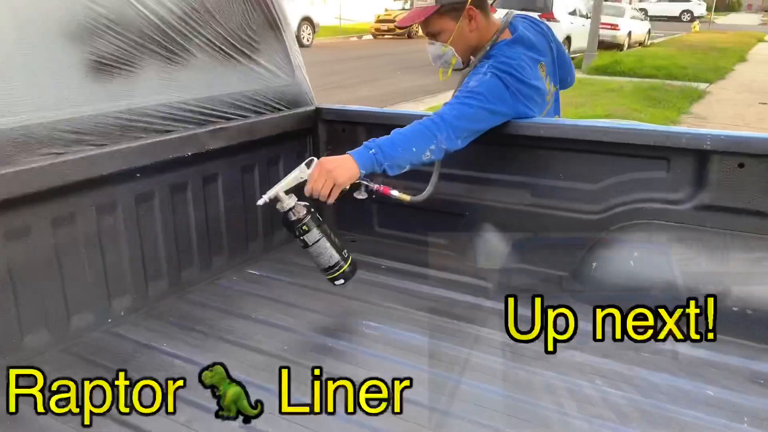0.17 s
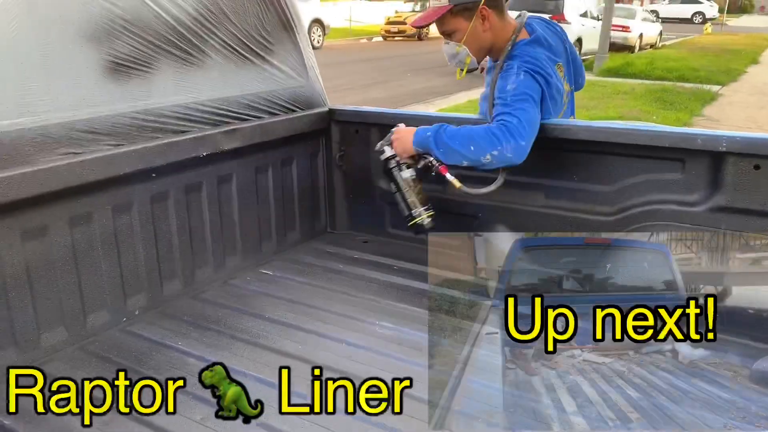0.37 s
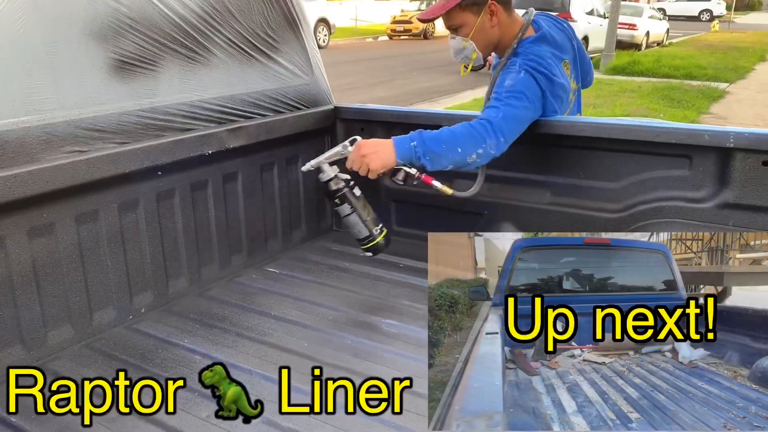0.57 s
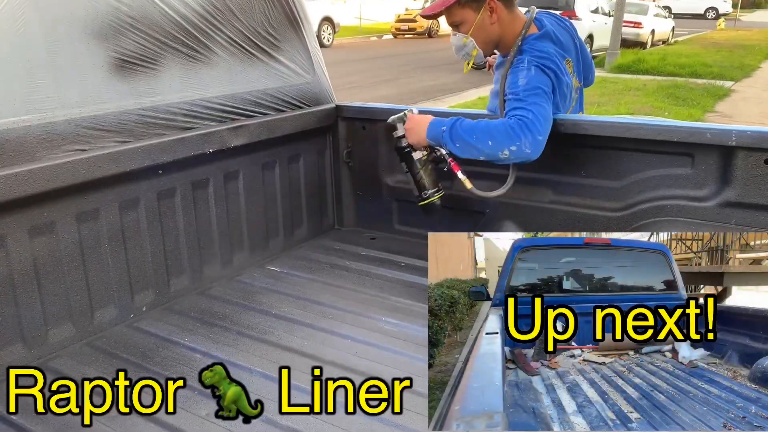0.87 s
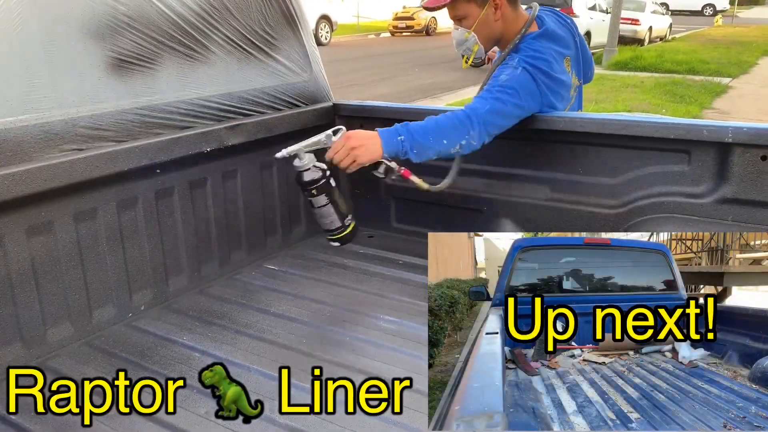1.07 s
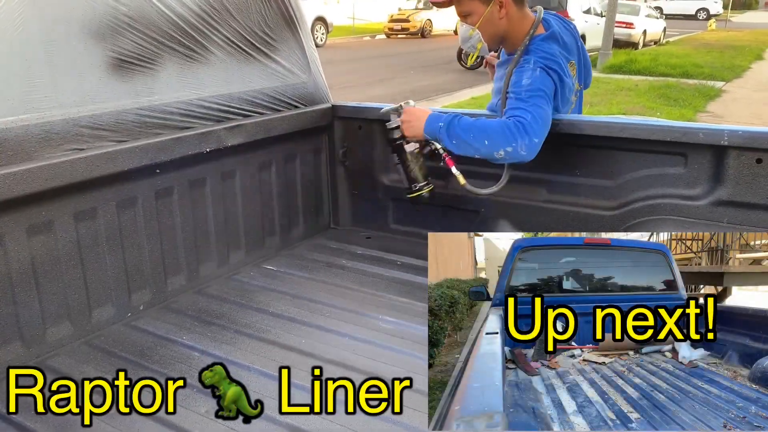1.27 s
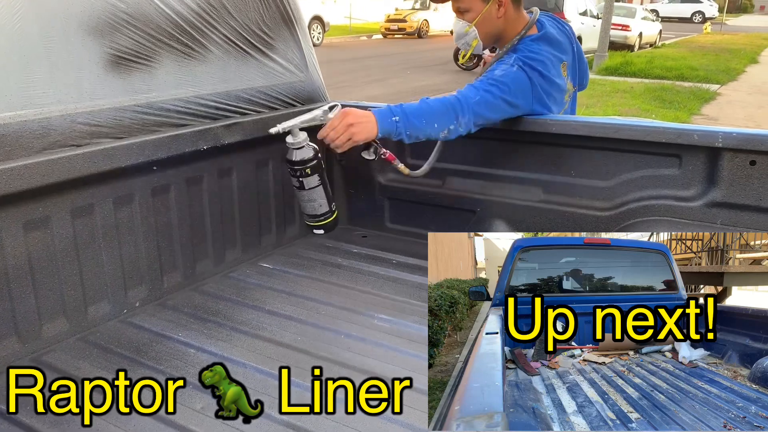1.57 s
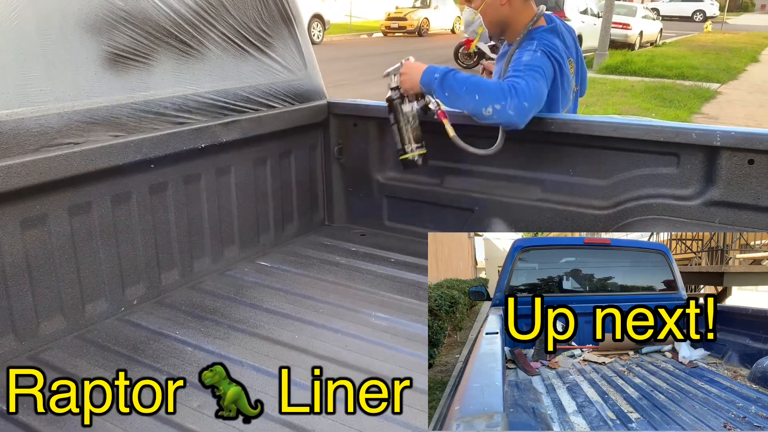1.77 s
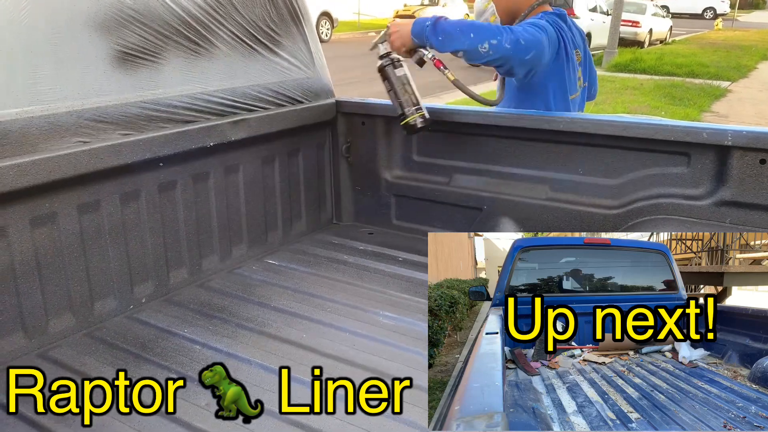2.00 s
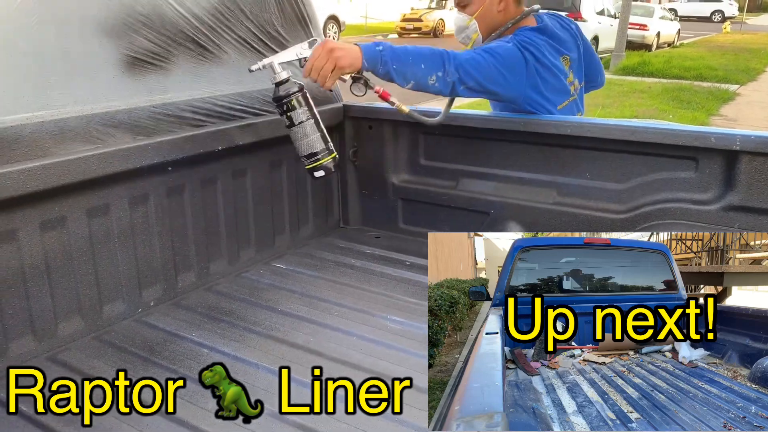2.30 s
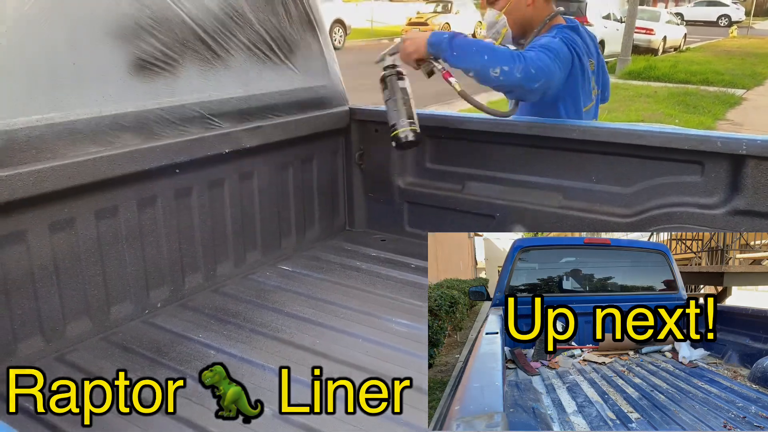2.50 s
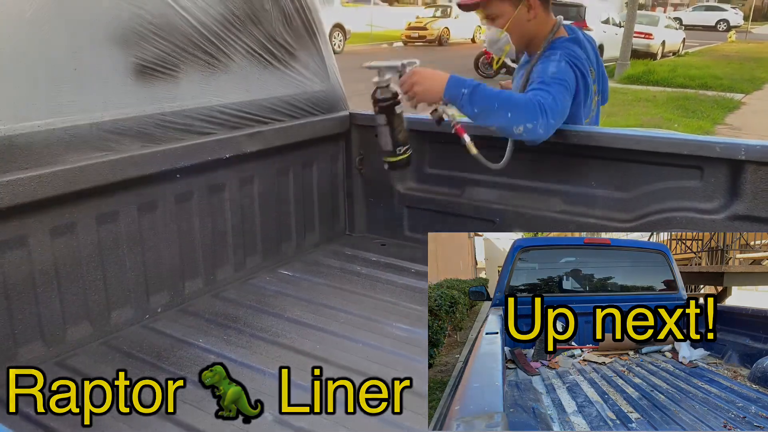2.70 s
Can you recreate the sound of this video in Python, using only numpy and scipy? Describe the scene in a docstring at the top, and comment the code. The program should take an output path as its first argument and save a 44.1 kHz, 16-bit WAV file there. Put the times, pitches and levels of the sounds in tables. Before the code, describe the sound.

A spray gun hisses in ten short, sputtering bursts of compressed air beside a quiet street

```python
"""Spray gun in a pickup bed

A compressed-air spray gun coats a pickup's bed in ten short trigger pulls: shaped noise makes a sputtering
jet hiss, and a delayed noise band with a gliding resonance makes a hollow rasp that shifts as the gun swings.
A steady leak of filtered noise is heard between pulls, and decaying sines give the bed a few dull knocks.
Behind are noise bands for the street and summed sines for a distant engine. The two microphone ports bleed
into each other with a short delay."""
import sys
import numpy as np
from scipy import signal
from scipy.fft import rfft, irfft, next_fast_len
from scipy.io import wavfile
from scipy.ndimage import uniform_filter1d, map_coordinates

SR = 44100
rng = np.random.default_rng(int(sys.argv[2]) if len(sys.argv) > 2 else 0)


def wrap_up_sound(samples):
    """Save the sound to the file named by the first command line argument, as 16-bit audio."""
    columns = np.atleast_2d(samples).T
    # keep every value between -1 and 1, then stretch to whole-number steps
    tamed = np.clip(columns, -1, 1)
    steps = np.round(tamed * 32767).astype(np.int16)
    wavfile.write(sys.argv[1], SR, steps)


N = 125685
T = np.arange(N) / SR  # time of each sample, s

# street rumble, spectrum shape: f/Hz, level/dB
RUMBLE_SPECTRUM = [(20, 6), (35, -13.5), (50, 1.5), (75, 1.5), (120, 1.5), (180, -3), (260, -8.5),
                   (380, -30), (800, -16), (2000, -44)]
# swell of the rumble: t/s, level/dB
RUMBLE_SWELL = [(0, 0), (.25, 2.5), (.7, -2.5), (.95, 1), (1.28, -3), (1.45, 2), (1.75, -0.5), (2.05, 2.5),
                (2.33, -1.5), (2.48, 0.5), (2.66, 1.5), (2.85, -1.5)]
# tyre noise, spectrum shape: f/Hz, level/dB
TYRE_SPECTRUM = [(200, -3), (450, -4), (750, 1.5), (1000, 4.5), (1350, -1), (1800, -11.5), (2400, -23),
                 (5000, -37)]
# swell of the tyre noise: t/s, level/dB
TYRE_SWELL = [(1.5, 0), (2.1, 1.5), (2.6, 0.5)]
# distant engine: t/s, firing rate f/Hz, level/dB
ENGINE = [(0, 79.2, -86), (.7, 78.9, -86), (.95, 86.5, -62), (1.2, 83, -85), (1.45, 92, -67),
          (1.75, 98.8, -110), (2.0, 106.1, -77), (2.33, 110.5, -61.5), (2.5, 97.7, -103),
          (2.68, 86.74, -58), (2.85, 84, -61)]
# knocks on the bed, before the panel balance: t/s, level/dB, pitch f/Hz, t60/s
KNOCKS = [(0.214, -47, 62.6, 0.13), (.507, -44, 287, 0.068), (0.975, -51.5, 267, 0.073),
          (2.646, -52.5, 263, 0.093)]
# panel modes of the bed: ratio to the pitch, level/dB
PANEL_MODES = [(1, 2), (1.17, -4), (1.4, -3.5), (1.62, -8), (1.9, -4.5)]
# air leak, spectrum shape: f/Hz, level/dB
LEAK_SPECTRUM = [(800, -4), (2500, -6.5), (3300, -2), (3500, 3), (3750, -3.5), (5700, -6.5), (7300, -5),
                 (10000, -6), (12500, -3.5), (15600, -4)]
# tone of the bed's scatter: f/Hz, level/dB
BED_COLOUR = [(3500, -0.5), (7000, -3)]
# rasp under the jet, spectrum shape: f/Hz, level/dB
RASP_SPECTRUM = [(700, -20), (1500, -7), (2000, -2), (2450, 1), (3000, 1), (3600, 1), (4400, 0), (5200, -1),
                 (7000, -8), (10000, -26)]
# swinging gun: t/s, extra path to the right port/m
GUN_SWING = [(.05, 0.053), (.18, 0.071), (.33, 0.071), (.43, 0.061), (.53, 0.053), (.63, 0.079),
             (.83, 0.076), (.93, 0.053), (1.01, .047), (1.12, 0.085), (1.27, 0.077), (1.36, 0.052),
             (1.46, 0.059), (1.57, 0.071), (1.69, 0.067), (1.79, 0.057), (2.08, 0.054), (2.26, 0.087),
             (2.42, 0.091), (2.6, 0.058)]
# hollow between gun and bed: t/s, resonance f/Hz, level over the rasp/dB
HOLLOW = [(.1, 4287, -8.5), (.65, 4944, -6), (1.15, 4566, -1), (1.3, 4390, -4.5), (1.8, 4118, -7.5),
          (2.2, 3845, -4.5), (2.45, 3910, -2.5), (2.6, 3810, -20)]
# jet hiss, spectrum shape: f/Hz, level/dB
JET_SPECTRUM = [(300, -29), (600, -25.5), (1100, -8.5), (1600, -8), (2400, -38), (3300, -26), (4500, -6.5),
                (6500, 1), (9000, 2), (12500, 2.5), (14500, 1), (15700, -5.5)]
# trigger pulls: opens t/s, closes t/s, change of level over the pull/dB
PULLS = [(0.041, 0.205, 3), (0.267, 0.458, 2), (0.488, 0.683, -1.5), (.736, 0.937, -1), (0.969, 1.136, 1),
         (1.189, 1.38, -0.5), (1.423, 1.595, 1), (1.642, 1.863, -1.5), (2.069, 2.283, 1.5),
         (2.369, 2.602, 0)]
# stereo likeness of the noises: f/Hz, likeness at the two ports (1 = identical)
ALIKE = [(250, 0.94), (500, 0.97), (800, 0.65), (1200, 0.49), (1800, 0.77), (2400, 0), (16000, 0.066)]
# tone of the ports: f/Hz, left port over right/dB
PORT_TILT = [(300, 0.4), (1400, 1), (2400, 0), (3800, 2), (5600, -0.5), (7600, 4), (9000, -5), (15000, -5)]
# bleed between the ports: f/Hz, share reaching the other channel
BLEED = [(1200, 0.0096), (2300, 0.17), (3300, 0.2), (4600, 0.04), (6800, 0.23), (8000, 0.62), (9000, 1),
         (15000, 1)]
# opening fade: t/s, level/dB
FADE_IN = [(0, -3), (.1, -3), (.19, 0)]

# base levels, before swells, valve and paint
RUMBLE_DB, TYRES_DB, LEAK_DB = -60.5, -69, -66.5
JET_DB, RASP_DB = -39, -49.5
STEADY_PATCHY_DB, RASP_PATCHY_DB = 0.7, 2.8  # depth of the random gain patches
ATTACK_S, SHUT_DB_PER_S = 0.0085, 1300  # trigger valve
BED_T60_S, BED_DB = 0.072, -13
HOLLOW_WIDTH_HZ = 500
DIRECT_PATH_M = 0.07  # swung this far, all of the rasp arrives direct
SOUND_M_PER_S = 343
PORT_DELAY_S, TOP_HZ = 0.000219, 15900


def amp(db):
    """Decibels to gain."""
    return 10 ** (np.asarray(db) / 20)


def unit(x):
    """Scale to rms 1."""
    return x / np.sqrt(np.mean(x ** 2) + 1e-20)


def along(points, hz):
    """Read a (Hz, value) curve on a log frequency axis."""
    f, value = np.transpose(points)
    return np.interp(np.log(hz + 1), np.log(f + 1), value)


def curves(rows):
    """One value per sample for each column after the time."""
    s, *columns = np.transpose(rows)
    return [np.interp(T, s, column) for column in columns]


def wobble(rate):
    """A smooth random curve with this many knots a second."""
    knots = rng.standard_normal(int(N * rate / SR) + 4)
    return map_coordinates(knots, [T * rate])


def filtered(x, response):
    """Filter by a complex response of frequency."""
    size = next_fast_len(N + SR // 4)
    hz = np.fft.rfftfreq(size, 1 / SR)
    return irfft(rfft(x, size) * response(hz), size)[..., :N]


def decay(t, t60):
    """Exponential decay, down 60 dB after t60 seconds."""
    return np.exp(-np.log(1000) * t / t60)


def rush(spectrum, patchy_db):
    """Shaped noise of rms 1 at the two ports, with time-frequency patches of random gain."""
    grid = signal.stft(rng.standard_normal((2, N)), nperseg=512)[2]
    field = rng.standard_normal(grid.shape[1:])
    for axis in (0, 1):
        field = uniform_filter1d(field, 4, axis=axis)
    pair = signal.istft(grid * amp(patchy_db * unit(field)), nperseg=512)[1][:, :N]

    def mid_side(hz):
        # the likeness sets how much is common to both ports
        turn = np.arccos(np.clip(along(ALIKE, hz), -1, 1)) / 2
        return amp(along(spectrum, hz)) * [np.cos(turn), np.sin(turn)]

    mid, side = filtered(pair, mid_side)
    return unit(np.array([mid + side, mid - side]))


def traffic():
    """Traffic is a swelling low rumble under a band of tyre noise."""
    rumble_db, = curves(RUMBLE_SWELL)
    tyres_db, = curves(TYRE_SWELL)
    rumble = amp(RUMBLE_DB + rumble_db) * rush(RUMBLE_SPECTRUM, patchy_db=2.0)
    tyres = amp(TYRES_DB + tyres_db) * rush(TYRE_SPECTRUM, STEADY_PATCHY_DB)
    return rumble + tyres


def distant_engine(overtone_db=-20):
    """The unsteady firing rate sounds with two weaker overtones, each overtone_db below the last."""
    hz, db = curves(ENGINE)
    phase = 2 * np.pi * np.cumsum(hz * (1 + 0.022 * wobble(25))) / SR
    orders = sum(amp(overtone_db * k) * np.sin((k + 1) * phase) for k in range(3))
    return unit(orders) * amp(db + 0.88 * wobble(27))


def knocks(rise_s=0.017):
    """Soft contacts ring the modes of a bed panel, with a rounded onset and a short decay."""
    out = np.zeros(N)
    for s, db, hz, t60 in KNOCKS:
        t = np.maximum(T - s, 0)
        ring = np.zeros(N)
        for ratio, mode_db in PANEL_MODES:
            ring += amp(mode_db) * np.sin(2 * np.pi * (hz * ratio * t + rng.random()))
        out += amp(db) * ring * (1 - np.exp(-t / rise_s)) * decay(t, t60)
    return out


def leak():
    """A little air escapes the gun throughout, a faint steady hiss."""
    return amp(LEAK_DB) * rush(LEAK_SPECTRUM, STEADY_PATCHY_DB)


def bed(x):
    """The ribbed steel bed adds a short decaying scatter, duller towards the top."""
    t = np.arange(SR // 5) / SR
    tail = rng.standard_normal((2, len(t))) * decay(t, BED_T60_S)
    scatter = signal.fftconvolve(x, tail / np.linalg.norm(tail[0]), axes=1)[:, :N]
    return x + amp(BED_DB) * filtered(scatter, lambda hz: amp(along(BED_COLOUR, hz)))


def hollow():
    """The hollow between gun and bed resonates: a narrow noise band carried on a gliding pitch."""
    hz, db = curves(HOLLOW)
    narrow = filtered(rng.standard_normal((2, N)), lambda f: 1 / (1 + (f / HOLLOW_WIDTH_HZ) ** 2))
    phase = 2 * np.pi * np.cumsum(hz) / SR
    return amp(db) * unit(narrow[0] * np.cos(phase) + narrow[1] * np.sin(phase))


def rasp(flutter_db=1.5, lift_db_per_s=-1):
    """The jet's undertone and the hollow reach the right port late, by a path that changes as the gun swings."""
    path, = curves(GUN_SWING)
    direct = np.clip(path / DIRECT_PATH_M, 0, 1) ** 2  # share of the power
    near = amp(lift_db_per_s * T)  # the undertone weakens as the gun is lifted away
    left = near * np.sqrt(direct) * rush(RASP_SPECTRUM, RASP_PATCHY_DB)[0] + hollow()
    right = map_coordinates(left, [(T - path / SOUND_M_PER_S) * SR])
    scattered = near * np.sqrt(1 - direct) * rush(RASP_SPECTRUM, RASP_PATCHY_DB)
    return (np.array([left, right]) + scattered) * amp(flutter_db * wobble(150))


def trigger_flow(puff=0.3, puff_s=0.004):
    """Each pull ramps the valve open with a small puff around the opening, then shuts it steeply."""
    flow = np.zeros(N)
    for opens, closes, change_db in PULLS:
        through = np.clip((T - opens) / (closes - opens), 0, 1) - 0.5
        opening = np.clip((T - opens) / ATTACK_S + 0.5, 0, 1)
        shutting = amp(-SHUT_DB_PER_S * np.maximum(T - closes, 0))
        burst = 1 + puff * np.exp(-np.abs(T - opens) / puff_s)
        flow += opening * shutting * burst * amp(change_db * through)
    return flow


def spray(surge_db=0.3, sputter_db=1.09, spit_db=1.25):
    """Air rushes out as hiss and rasp; thick paint passing the nozzle makes it surge, sputter and spit."""
    paint = amp(surge_db * wobble(70) + sputter_db * wobble(260) + spit_db * wobble(1200))
    jet = amp(JET_DB) * rush(JET_SPECTRUM, patchy_db=2.2)
    return trigger_flow() * paint * (jet + amp(RASP_DB) * rasp())


def scene():
    """The street and engine, the knocks, the leak and the gun over the bed."""
    return traffic() + distant_engine() + knocks() + leak() + bed(spray())


def record(dry):
    """Each channel takes in the other port a moment later; the level eases up at the start, the top is cut."""
    def port_tone(hz):
        ratio = amp(along(PORT_TILT, hz))  # left over right, at constant total power
        return np.array([ratio, np.ones_like(hz)]) * np.sqrt(2) / np.hypot(1, ratio)

    def share(hz):
        return np.clip(along(BLEED, hz), 0, 1)

    ports = filtered(dry, port_tone)
    crossed = filtered(ports[::-1], lambda hz: share(hz) * np.exp(-2j * np.pi * hz * PORT_DELAY_S))
    fade_db, = curves(FADE_IN)
    # the division offsets the power added by the bleed
    return filtered((ports + crossed) * amp(fade_db), lambda hz: (hz < TOP_HZ) / np.hypot(1, share(hz)))


dry = scene()
out = record(dry)
wrap_up_sound(out)
```